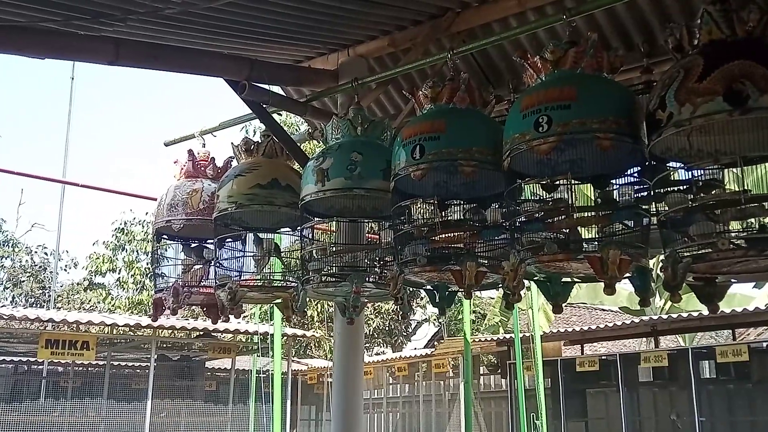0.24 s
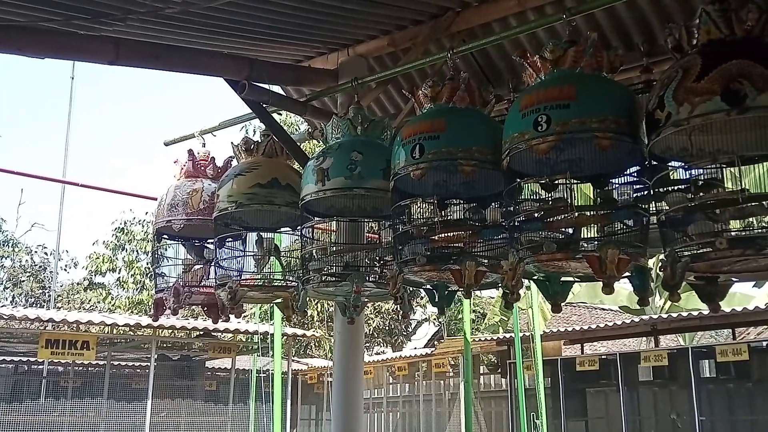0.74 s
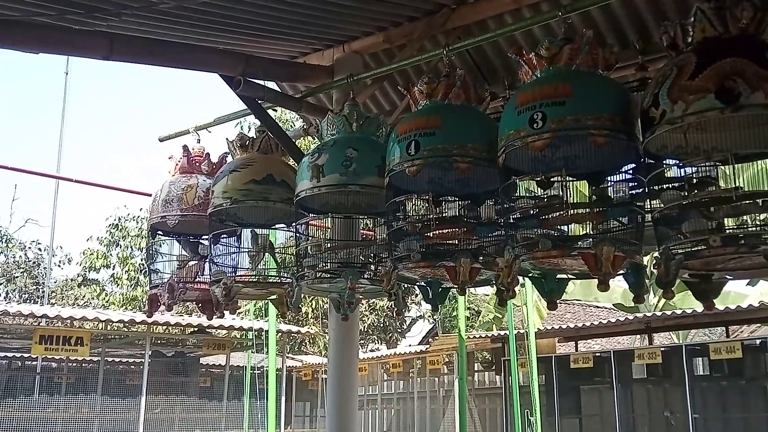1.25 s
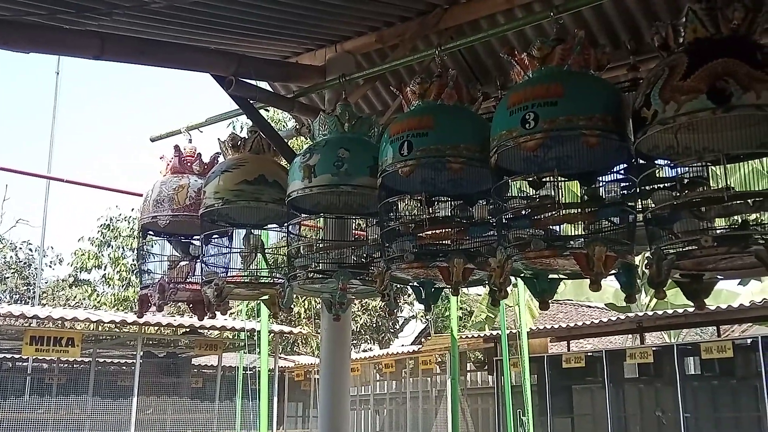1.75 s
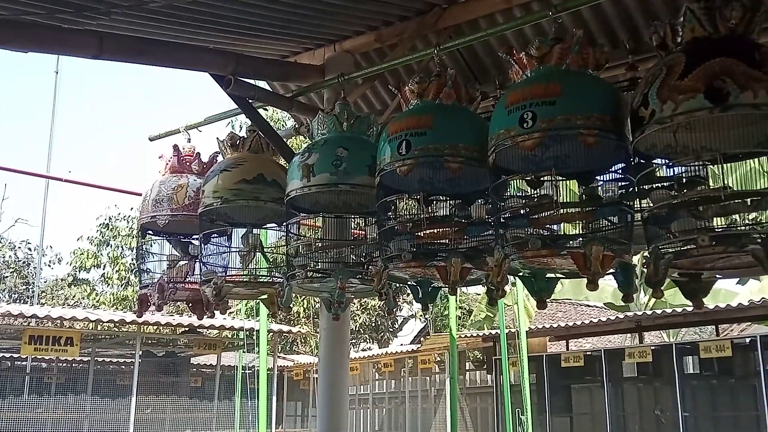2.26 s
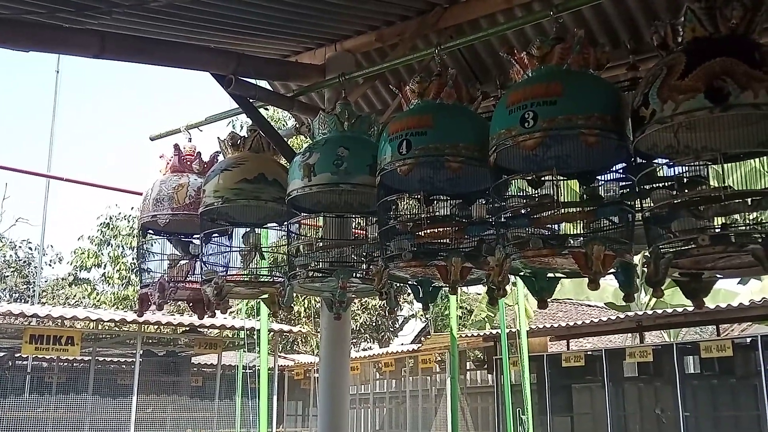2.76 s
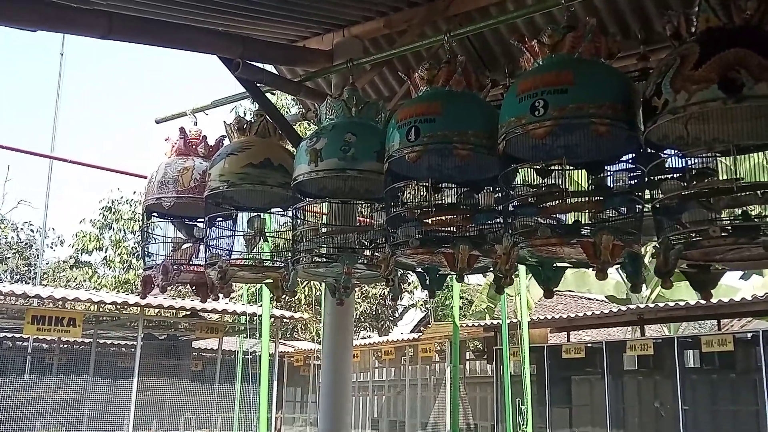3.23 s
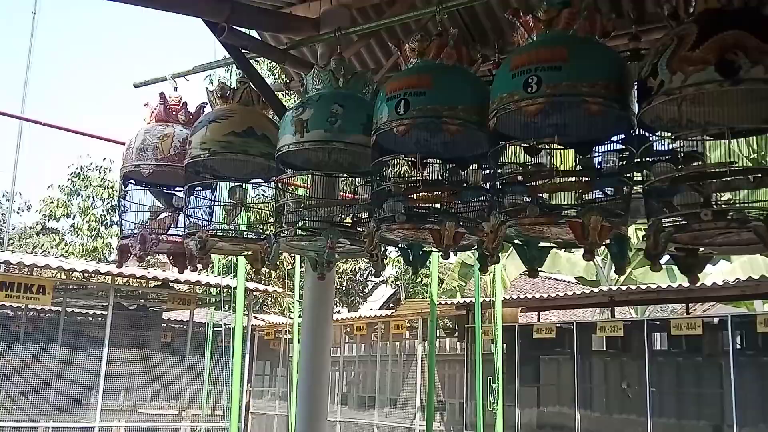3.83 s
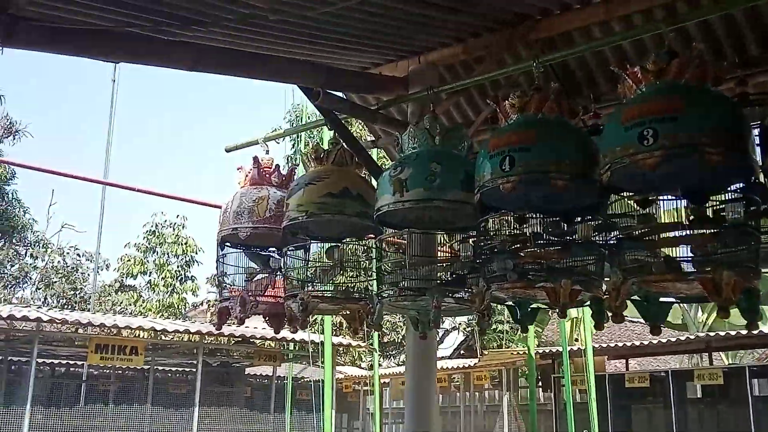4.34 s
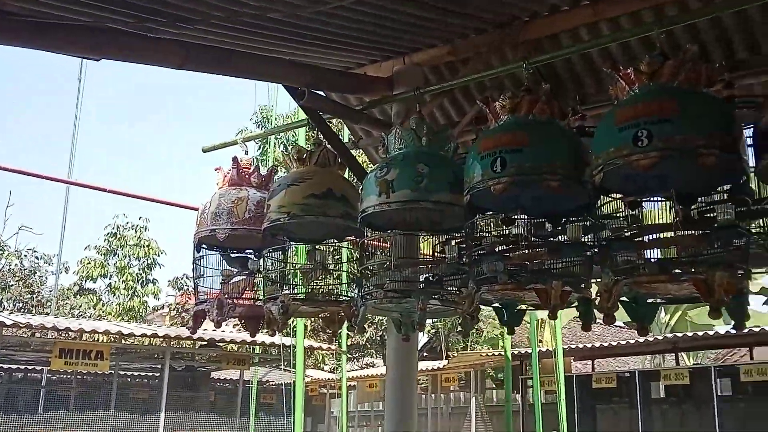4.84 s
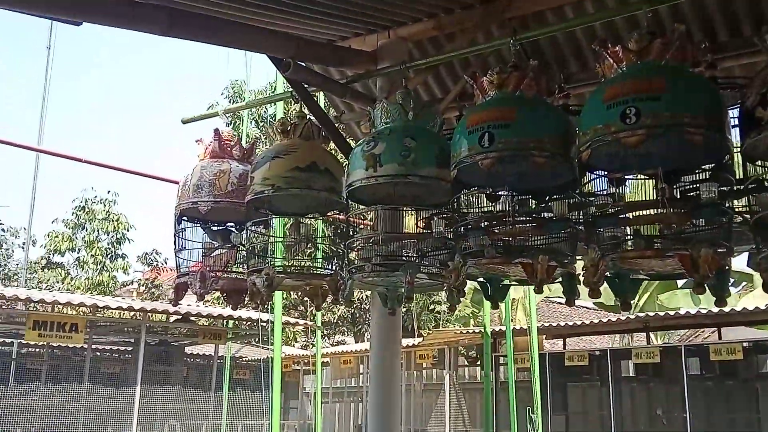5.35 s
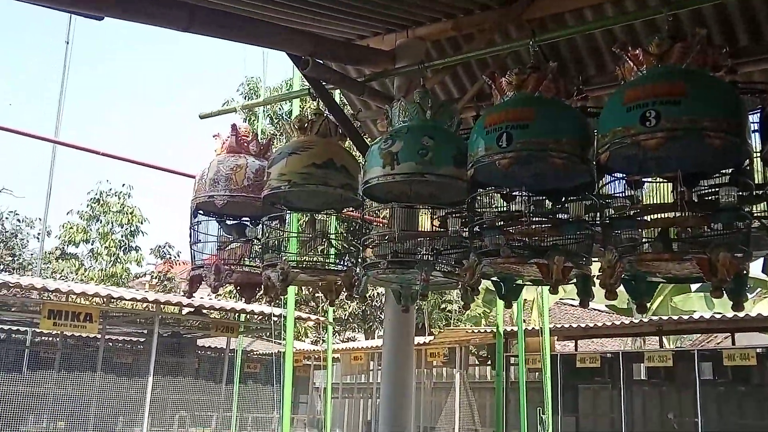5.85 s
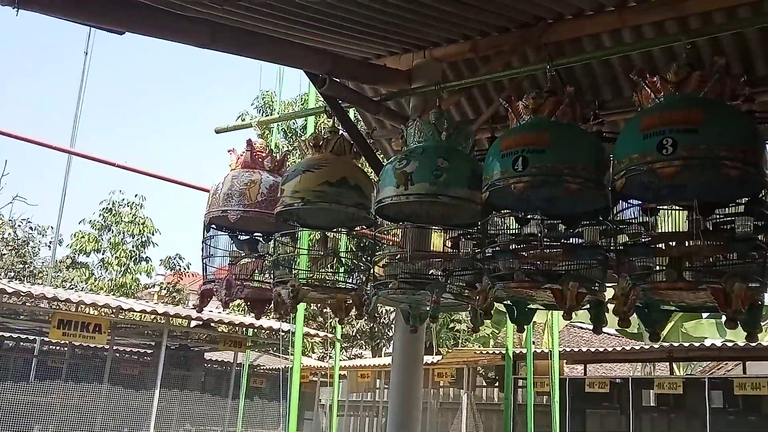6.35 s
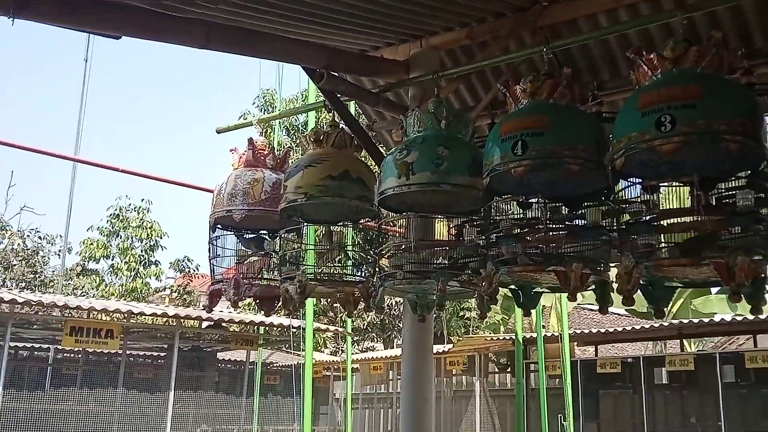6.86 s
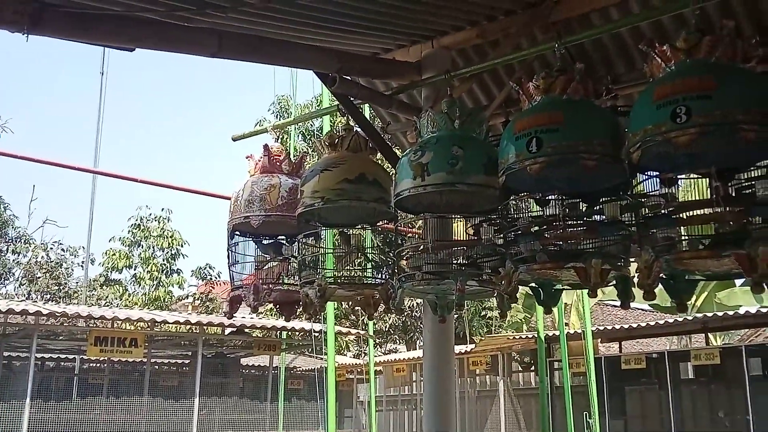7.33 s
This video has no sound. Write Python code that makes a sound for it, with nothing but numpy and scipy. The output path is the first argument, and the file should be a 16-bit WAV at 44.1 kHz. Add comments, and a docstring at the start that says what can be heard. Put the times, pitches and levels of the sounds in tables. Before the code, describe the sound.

Caged doves coo under a sheet roof with a short, diffuse echo. From 0 to 2.5 seconds the calls are soft and deep: round falling coos, purring rolls and faint held notes further away. Small birds give sparse, raspy falling chirps throughout, and light bright ticks come from the cages, clustered around 1.3 to 1.8 and again near 4.4. Around 3 seconds a clearer, higher coo dips and swells, trailing into a trill. From 4.7 the doves grow much louder and busier; the strongest, highest coo sinks in pitch near 4.8 to 5.05. Short coos and rolling trills overlap, with prominent arched calls at 5.7 and 6.7, then softer cooing to 7.6. Dry scuffs and grainy hiss flicker behind, strongest near 4.9. Small clicks come near 6 and 6.2, a dull bump at 6.6. A distant engine rumbles unevenly, swelling at the very end.

```python
"""Doves under a sheet roof

Caged doves coo in overlapping runs: gliding near-pure tones that break into trills made of short tone puffs.
Small birds chirp further off as falling raspy whistles; the cages tick, and bumps and knocks are noise bursts.
A distant engine is two wavering low tones in uneven low noise, under a faint, grainy, flickering rustle.
Faint wavering tones come from far outside. Decaying noise gives calls and ticks the echo of the roof."""
import sys
import numpy as np
from scipy import signal
from scipy.fft import rfft, irfft, next_fast_len
from scipy.io import wavfile
from scipy.ndimage import uniform_filter1d, map_coordinates

SR = 44100
rng = np.random.default_rng(int(sys.argv[2]) if len(sys.argv) > 2 else 0)


def waveform_to_disk(signal):
    """Save audio, clipped to [-1, 1], as 16-bit WAV at the path in sys.argv[1]."""
    frames = np.transpose(np.atleast_2d(signal))
    scaled = np.clip(frames, -1, 1) * 32767
    samples = np.round(scaled).astype(np.int16)
    wavfile.write(sys.argv[1], SR, samples)


N = 334719  # samples

# In all tables of notes the pitches are those of the glide, before the scoop and droop at its ends.


def doves():
    """Low-pass radiation: the throat holds back all higher overtones of deep, high and far voices."""
    voices = deep_doves() + high_doves() + far_doves()
    return filtered(voices, lambda hz: 1 / (1 + (hz / 1620) ** 20))


# long falling coos, levels before the standing waves: start_s, length_s, first_pitch_hz, last_pitch_hz, level_db
FALLING_COOS = [(0.2, 0.71, 636, 564.6, -53), (2.58, 0.63, 645.5, 578.2, -52),
                (4.89, .63, 656.7, 569, -54.5)]
# short coos, and at 1.01 s a faint held note from further down the row; levels before the standing waves:
# start_s, length_s, first_pitch_hz, last_pitch_hz, level_db
DEEP_COOS = [(0, 0.23, 465, 420.8, -48.5), (1.01, 0.47, 557, 568, -84), (1.63, 0.24, 645, 611.3, -50),
             (2.1, 0.23, 477.3, 456, -49.5), (3.14, 0.559, 479.6, 453, -50.5),
             (4.02, 0.19, 642.5, 618.7, -50)]
# rolled parts of the deep calls: start_s, rise_s, fall_s, centre_hz, peak_db
DEEP_TRILLS = [(-.1, 0.092, 0.24, 552, -50), (1.59, 0.026, 0.16, 588, -55.5), (2.07, 0.32, 0.3, 564, -52.5),
               (2.72, 0.31, 0.12, 463, -52.5), (3.98, 0.024, 0.065, 590, -52), (4.48, 0.19, 0.31, 548, -56),
               (7.2, 0.12, 0.14, 573, -55)]
# one standing wave that hums on after the deep coos: centre_hz, width_hz, level_db
SHED_MODE = [(624, 5.3, -1.5)]


def deep_doves():
    """Room resonance: standing waves colour the deep coos, and one mode rings on after them."""
    calls = notes(FALLING_COOS, attack_s=0.0577, release_s=0.17, scoop=0.0069, droop=0.2187,
                  onset_db=-3.5, end_db=-2)
    calls += notes(DEEP_COOS, attack_s=0.041, release_s=0.077, scoop=0.02, droop=0.07,
                   onset_db=0.5, end_db=-13)
    clear = coos(through_standing_waves(calls), octave_db=-56, jitter=0.0088, flutter_db=1.9, wet_db=-4.5)
    rolls = swells(DEEP_TRILLS, onset_db=-13.5, end_db=-5.5, climb_per_s=0)
    rolled = trills(rolls, rate=42, uneven=0.13, puff_s=0.0158, scatter=0.033, wet_db=-1)
    return ringing(clear, SHED_MODE) + rolled


# response of the shed to a gliding deep coo: pitch_hz, gain_db
STANDING_WAVES = [(400, 4), (435, -14.5), (455, 6), (468, -6.5), (482, 9.5), (520, 1.5), (566, 14),
                  (592, -11.5), (603, 7), (612, -9), (624, 5), (641, -2), (655, 7.5)]


def through_standing_waves(calls):
    """Modal response: the level of each note follows the shed's gain at its momentary pitch."""
    return [np.column_stack([s, hz, db + along(STANDING_WAVES, hz)]) for s, hz, db in map(np.transpose, calls)]


# arched coos that open rolls: start_s, length_s, first_pitch_hz, last_pitch_hz, level_db
ARCHED_COOS = [(5.69, 0.23, 764.5, 772, -34), (6.69, 0.267, 745.6, 748, -36)]
# a softer coo rises, sags in the middle and swells again: time_s, pitch_hz, level_db
RISING_COO = [(2.925, 674, -56), (3.0, 761, -41), (3.085, 772, -54), (3.15, 756, -40.5), (3.21, 740, -53)]
# plain short coos: start_s, length_s, first_pitch_hz, last_pitch_hz, level_db
HIGH_COOS = [(4.71, 0.085, 715, 730, -39), (4.745, 0.074, 770, 782, -36.5), (5.04, 0.073, 814, 777, -33),
             (5.08, 0.085, 710, 695, -43.5), (5.375, 0.11, 713, 715, -38), (5.55, 0.11, 692, 686, -43.5),
             (5.93, 0.083, 747, 729, -35.5), (6.01, 0.15, 690.4, 681, -39.5), (6.6, 0.14, 675, 697, -48.5),
             (6.77, 0.18, 692, 683, -41), (6.91, 0.19, 734, 721, -43), (7.18, .14, 760, 630, -47),
             (7.32, 0.17, 690, 693, -48), (7.45, 0.2, 712, 698, -48.5)]
# the loudest coo lies in a higher register and swells as it sinks: time_s, pitch_hz, level_db
LEAPING_COO = [(4.779, 879, -35.5), (4.831, 882, -33), (4.897, 872, -34), (4.985, 850, -28),
               (5.046, 824, -31)]
# rolled parts of the high calls: start_s, rise_s, fall_s, centre_hz, peak_db
HIGH_TRILLS = [(2.88, 0.34, 0.64, 748, -49.5), (4.65, 0.13, 0.084, 750, -46), (5.02, 0.067, 0.22, 760, -60),
               (5.32, 0.02, 0.17, 782, -51.5), (5.66, 0.3, 0.52, 781, -44.5), (6.6, 0.4, 0.65, 773, -44.5)]


def high_doves():
    """Frequency glides: high voices sound arched, short and leaping coos, and rolls that creep upward."""
    arched = notes(ARCHED_COOS, attack_s=0.0727, release_s=0.029, scoop=0.1184, droop=0.059,
                   onset_db=-27.5, end_db=-9.5)
    short = notes(HIGH_COOS, attack_s=0.028, release_s=0.0425, scoop=0.03, droop=0.022,
                  onset_db=-4.5, end_db=-13.5)
    rolls = swells(HIGH_TRILLS, onset_db=-12, end_db=-29, climb_per_s=0.2)
    out = coos(arched + [RISING_COO], octave_db=-32, jitter=0.0038, flutter_db=2.3, wet_db=-13)
    out += coos(short, octave_db=-38.5, jitter=0.0044, flutter_db=2, wet_db=-4.5)
    out += coos([LEAPING_COO], octave_db=-35, jitter=0.003, flutter_db=1, wet_db=-18)
    return out + trills(rolls, rate=57.5, uneven=0.08, puff_s=0.009, scatter=0.035, wet_db=2)


# faint held notes from further down the row: start_s, length_s, first_pitch_hz, last_pitch_hz, level_db
FAR_COOS = [(0.2, 0.48, 673, 679, -66.5), (.9, 0.385, 653, 667, -64.5), (1.2, 0.42, 669.4, 669, -61),
            (6.48, 0.1394, 600, 622, -62)]


def far_doves():
    """Held tones with a stronger second harmonic, from further down the row."""
    calls = notes(FAR_COOS, attack_s=0.11, release_s=0.08, scoop=0.016, droop=-0.0078, onset_db=-9, end_db=-8)
    return coos(calls, octave_db=-10, jitter=0.005, flutter_db=2.2, wet_db=-8)


def coos(calls, octave_db, jitter, flutter_db, wet_db):
    """Acoustic filtering: with the beak shut, the swollen throat passes an almost pure tone."""
    out = np.zeros(N)
    for call in calls:
        hz, gain = contour(call)
        n = len(hz)
        phase = phase_of(hz * (1 + jitter * wobble(70.8, n)))
        tone = np.sqrt(2) * (np.sin(phase) + amp(octave_db) * np.sin(2 * phase))
        flutter = amp(flutter_db * wobble(60.4, n))
        add(out, call[0][0], under_roof(tone * gain * flutter, wet_db))
    return out


def trills(calls, rate, uneven, puff_s, scatter, wet_db):
    """Pulsed excitation: the syrinx opens rate times a second, each time letting out one puff of tone."""
    out = np.zeros(N)
    t = np.arange(0, puff_s, 1 / SR)
    window = np.sin(np.pi * t / puff_s) ** 2
    for call in calls:
        hz, gain = contour(call)
        n = len(hz)
        roll = np.zeros(n)
        turns = np.cumsum(rate * (1 + uneven * wobble(rate / 2, n))) / SR
        for i in np.flatnonzero(np.diff(np.floor(turns))):
            size, detune = rng.standard_normal(2)
            puff_hz = hz[i] * (1 + scatter * detune)
            puff = window * np.cos(2 * np.pi * puff_hz * (t - puff_s / 2))
            add(roll, i / SR, amp(2 * size) * puff)
        add(out, call[0][0], under_roof(unit(roll) * gain, wet_db))
    return out


def notes(rows, attack_s, release_s, scoop, droop, onset_db, end_db):
    """Pitch glide: a note bends into its glide and out of it as the level changes. Gives (s, Hz, dB) tracks."""
    calls = []
    for s, length, first_hz, last_hz, db in rows:
        t = np.arange(0, length, 1 / 1000)
        rise = np.clip(1 - t / attack_s, 0, 1)
        fall = np.clip(1 - (length - t) / release_s, 0, 1)
        glide = np.interp(t, [attack_s, max(attack_s, length - release_s)], [first_hz, last_hz])
        hz = glide * (1 - scoop * rise) * (1 - droop * fall)
        calls.append(np.column_stack([s + t, hz, db + onset_db * rise + end_db * fall]))
    return calls


def swells(rows, onset_db, end_db, climb_per_s):
    """Amplitude envelope: a roll swells to a rounded peak and dies away. Gives (s, Hz, dB) tracks."""
    calls = []
    for s, rise, fall, hz, db in rows:
        t = np.linspace(max(s, 0), s + rise + fall, 20)
        past_peak = t - s - rise
        before_db = onset_db * (past_peak / rise) ** 2
        after_db = end_db * (past_peak / fall) ** 2
        sink_db = np.where(past_peak < 0, before_db, after_db)
        climb = 1 + climb_per_s * np.maximum(past_peak, 0)
        calls.append(np.column_stack([t, hz * climb, db + sink_db]))
    return calls


def contour(call, fade=0.012):
    """Interpolated modulation: pitch and gain of one call per sample, with smooth edges of fade seconds."""
    s, hz, db = np.transpose(call)
    t = np.arange(s[0], s[-1], 1 / SR)
    edges = np.clip(np.minimum(t - s[0], s[-1] - t) / fade, 0, 1)
    return np.interp(t, s, hz), amp(np.interp(t, s, db)) * np.sin(edges * np.pi / 2) ** 2


# steep chirps: start_s, level_db
CHIPS = [(.24, -60.5), (.85, -72.5), (.97, -58.5), (2.09, -60), (3.01, -59), (3.99, -57), (4.75, -54),
         (5.55, -54.5), (5.98, -55.5), (6.95, -58)]
# lower, flatter chirps: start_s, level_db
CHEEPS = [(1.10, -62.5), (2.38, -60), (3.15, -57.5), (4.18, -57.5), (5.07, -61.5), (5.23, -64), (6.15, -59)]


def small_birds():
    """Downward frequency sweeps: steep chips and lower, flatter cheeps."""
    chips = chirps(CHIPS, start_hz=4217, end_hz=2910, length=0.065, rasp=0.1233, upper_db=-9.5, wet_db=3)
    cheeps = chirps(CHEEPS, start_hz=3726, end_hz=2840, length=0.095, rasp=0.085, upper_db=-13, wet_db=1)
    return chips + cheeps


def chirps(rows, start_hz, end_hz, length, rasp, upper_db, wet_db):
    """Frequency modulation: raspy falling whistles with a weaker upper voice, heard mostly by their echoes."""
    out = np.zeros(N)
    u = np.linspace(0, 1, int(length * SR))
    envelope = np.sqrt(np.abs(np.sin(np.pi * u)))
    for s, db in rows:
        sweep = start_hz + (end_hz - start_hz) * u ** 1.5
        phase = phase_of(sweep * (1 + rasp * wobble(696.5, len(u))))
        whistle = np.sin(phase) + amp(upper_db) * np.sin(1.5 * phase)
        add(out, s, under_roof(amp(db) * unit(whistle * envelope), wet_db))
    return out


# ticks on the cages, level before the common lift: start_s, level_db, low_ring_share_db
TICKS = [(0.421, -55, -5.5), (1.295, -50.5, -9), (1.334, -54, 3.5), (1.6066, -49.5, -14), (1.708, -50, -21),
         (1.7568, -55.5, -12), (1.806, -46.5, -11), (2.226, -51.5, -10), (2.399, -52.5, 2.5),
         (4.368, -53.5, -30), (4.4187, -51, -11), (4.462, -52.5, -22), (4.757, -54.5, -20),
         (6.688, -52.5, -7), (7.5084, -50.5, -7.5)]
# spectrum of the bright snap: frequency_hz, relative_level_db
TICK_TOP = [(4500, -29), (6800, 0.5), (9500, -7), (15500, -13)]


def ticks(lift_db, rise_s, t60, wet_db):
    """Impact excitation: beaks and claws strike the thin bars, a bright snap over a lower ring."""
    out = np.zeros(N)
    t = np.arange(SR // 8) / SR
    for s, db, low_db in TICKS:
        snap = noise(TICK_TOP, len(t)) + amp(low_db) * band(4100, 0.69, len(t))
        envelope = amp(db + lift_db - 60 * t / t60) * (1 - np.exp(-t / rise_s))
        add(out, s, under_roof(envelope * snap, wet_db))
    return out


# dry clicks close by: start_s, starting_level_db
CLICKS = [(5.958, -49), (6.1732, -40)]


def clicks(t60):
    """Near-field impulses: quickly decaying noise with the scuffs' spectrum and no echo."""
    out = np.zeros(N)
    t = np.arange(SR // 8) / SR
    for s, db in CLICKS:
        add(out, s, amp(db - 60 * t / t60) * noise(SCUFF, len(t)))
    return out


# soft bumps and hollow knocks: start_s, centre_hz, width_octaves, level_db
BUMPS = [(1.459, 340, 0.94, -56), (2.392, 1640, 0.51, -61.5), (5.263, 1750, 0.52, -60),
         (6.119, 232, 0.16, -55), (6.335, 1324, 0.41, -62.5), (6.64, 236.3, 0.12, -44.5)]


def bumps(rise_s):
    """Damped broad resonance: dull bumps and knocks from around the yard."""
    out = np.zeros(N)
    u = np.arange(SR // 3) / SR / rise_s
    for s, hz, octaves, db in BUMPS:
        add(out, s, amp(db) * u * np.exp(1 - u) * band(hz, octaves, len(u)))
    return out


# level of the airy hiss before the common lift: time_s, level_db
HISS = [(0, -72), (1.6, -77.5), (1.95, -68.5), (2.35, -69), (2.8, -69), (3.25, -66), (3.55, -78.5),
        (4.05, -66), (4.33, -76), (4.5, -65.5), (4.59, -80), (4.63, -68), (4.93, -58), (5.25, -68),
        (5.76, -61.5), (5.85, -79), (5.93, -64), (6.25, -62.5), (6.47, -72.5), (6.55, -65.5), (7.59, -65.5)]
# spectrum of the hiss: frequency_hz, relative_level_db
RUSTLE = [(800, -10.5), (1300, -1.5), (2300, -7.5), (4200, -7.5), (6300, 3), (8000, -4.5), (10000, 2.5),
          (15500, -17.5)]


def rustle(lift_db, fizz_db, patchy_db):
    """Amplitude modulation: an airy hiss with a random grainy flicker, brightest at its peaks."""
    flicker = grainy_flicker(rate=160, spread_db=12.5, t60=0.22)
    fizz = amp(fizz_db) * unit(flicker ** 2) * band(13500, 0.7, N)
    hiss = flicker * patchy(noise(RUSTLE, N), patchy_db)
    return amp(level_curve(HISS) + lift_db) * (hiss + fizz)


def grainy_flicker(rate, spread_db, t60):
    """Shot noise: gain of rms 1 from random grains, each with a sudden start and a quick decay."""
    grains = (rng.random(N) < rate / SR) * amp(spread_db * rng.uniform(-1, 1, N))
    decay = amp(-60 * np.arange(SR // 4) / SR / t60)
    power = signal.fftconvolve(grains ** 2, decay ** 2)[:N]
    return unit(np.sqrt(np.abs(power)))


# dry scuffs and rustles: start_s, length_s, level_db
SCUFFS = [(0.131, 0.42, -72.5), (2.32, 0.32, -68), (2.915, 0.58, -65), (4.794, 0.47, -63),
          (5.942, 0.54, -67), (6.599, 0.13, -60.5), (7.044, 0.31, -64)]
# spectrum of scuffs and clicks: frequency_hz, relative_level_db
SCUFF = [(800, -4.5), (1300, 6.5), (3500, -1), (6500, -0.5), (15000, -31)]


def scuffs(grain_db, patchy_db):
    """Friction noise: dry scuffs swell and fade in clumps of fine grains."""
    out = np.zeros(N)
    for s, length, db in SCUFFS:
        n = int(length * SR)
        clumps = amp(grain_db * (wobble(30.2, n) + wobble(250, n)))
        grains = clumps * patchy(noise(SCUFF, n), patchy_db)
        add(out, s, amp(db) * signal.windows.tukey(n, 0.5) * unit(grains))
    return out


# fixed resonances that colour the rustle and scuffs: centre_hz, width_hz, level_over_plain_sound_db
COLOUR_RINGS = [(3000, 110, -3), (3620, 130, 4), (4290, 250, 0.5)]


def coloured_rustle():
    """Resonant colouration: fixed narrow resonances colour the rustle and scuffs."""
    source = rustle(lift_db=1.5, fizz_db=-14.5, patchy_db=3.8) + scuffs(grain_db=2, patchy_db=3.8)
    return ringing(source, COLOUR_RINGS)


# level of the low rumble, before a random wobble: time_s, level_db
RUMBLE_LEVEL = [(0, -59.5), (0.45, -75), (0.72, -66.5), (1.5, -71.5), (1.75, -69), (1.99, -74),
                (2.13, -64.5), (2.85, -67), (3.04, -74), (3.23, -61.5), (4.2, -64.5), (4.6, -59),
                (5.8, -61), (7.3, -59), (7.59, -48.5)]
# spectrum of the low noise: frequency_hz, relative_level_db
RUMBLE = [(25, -25), (48, -16.5), (75, -2.5), (150, -10.5), (600, -36), (2500, -69.5)]


def engine(hum_hz, hum_db, second_db, noise_db, wobble_db):
    """Harmonic tones in noise: a far engine as two wavering low tones in an uneven low rumble."""
    phase = phase_of(hum_hz * (1 + 0.0207 * wobble(12, N)))
    hum = amp(hum_db + 4.7 * wobble(42, N)) * np.sin(phase)
    hum += amp(second_db + 6.1 * wobble(24, N)) * np.sin(2 * phase)
    level = amp(level_curve(RUMBLE_LEVEL) + wobble_db * wobble(12, N))
    return level * (hum + amp(noise_db) * noise(RUMBLE, N))


# wavering tones from far outside the shed: start_s, length_s, first_pitch_hz, last_pitch_hz, level_db
FAR_TONES = [(0, 0.3, 130, 135, -60.5), (0.48, 0.26, 181.4, 119, -65), (4.57, 0.113, 1126, 1202, -63.5),
             (6.47, 0.3, 1285, 1110, -63.5)]
# a low tone that wanders up and down: time_s, pitch_hz, level_db
WANDERING_TONE = [(3.12, 153.7, -59), (3.27, 183.8, -58.5), (3.42, 149.2, -62), (3.64, 172, -59),
                  (3.84, 197.6, -60.5), (4.05, 127, -66)]


def far_tones():
    """Random frequency modulation: wavering tones from far outside the shed."""
    distant = notes(FAR_TONES, attack_s=0.03, release_s=0.063, scoop=0, droop=0, onset_db=2, end_db=-6)
    out = coos(distant, octave_db=-31, jitter=0.03, flutter_db=4, wet_db=5)
    return out + coos([WANDERING_TONE], octave_db=-19, jitter=0.025, flutter_db=3, wet_db=-3)


def under_roof(x, wet_db, t60=0.38):
    """Diffuse reverberation: direct sound plus the answer of roof and walls, at equal total power."""
    t = np.arange(SR // 2) / SR
    wet = signal.fftconvolve(x, rng.standard_normal(len(t)) * amp(-60 * t / t60))
    wet *= amp(wet_db) * np.linalg.norm(x) / np.linalg.norm(wet)
    return (np.pad(x, (0, len(t) - 1)) + wet) / np.hypot(1, amp(wet_db))


def ringing(x, rings):
    """Modal resonance: add narrow modes, given as (Hz, width Hz, dB), that ring on after the sound."""
    def response(hz):
        modes = (amp(db) * 1j * hz * w / (c * c - hz * hz + 1j * hz * w) for c, w, db in rings)
        return 1 + sum(modes)
    return filtered(x, response)


def patchy(x, depth_db):
    """Time-frequency modulation: patches of the spectrum swell and fade on their own."""
    z = signal.stft(x, nperseg=512)[2]
    field = uniform_filter1d(rng.standard_normal(z.shape), size=7, axis=0)
    field = uniform_filter1d(field, size=12, axis=1)
    return unit(signal.istft(z * amp(depth_db * unit(field)), nperseg=512)[1][:len(x)])


def noise(spectrum, n):
    """Spectral shaping: coloured noise of rms 1."""
    return unit(filtered(rng.standard_normal(n), lambda hz: amp(along(spectrum, hz))))


def band(centre_hz, octaves, n):
    """Broad resonance: noise of rms 1 under a bell curve on a log frequency axis."""
    def bell(hz):
        return np.exp(-(np.log2((hz + 1) / centre_hz) / octaves) ** 2)
    return unit(filtered(rng.standard_normal(n), bell))


def filtered(x, response):
    """Linear filtering: the spectrum of x times a response of frequency."""
    m = next_fast_len(len(x) + SR // 4)
    return irfft(rfft(x, m) * response(np.fft.rfftfreq(m, 1 / SR)), m)[:len(x)]


def wobble(rate, n):
    """Band-limited fluctuation: a smooth random curve with rate knots a second."""
    return map_coordinates(rng.standard_normal(int(n * rate / SR) + 4), [np.arange(n) * rate / SR])


def phase_of(hz):
    """Phase is the running integral of frequency."""
    return 2 * np.pi * np.cumsum(hz) / SR


def amp(db):
    """Logarithmic level: decibels to gain."""
    return 10 ** (np.asarray(db) / 20)


def unit(x):
    """Power normalisation: scale to rms 1."""
    return x / np.sqrt(np.mean(x ** 2) + 1e-20)


def along(points, hz):
    """Log-frequency interpolation of (Hz, value) points."""
    f, v = np.transpose(points)
    return np.interp(np.log(hz + 1), np.log(f), v)


def level_curve(rows):
    """Linear interpolation of (s, dB) rows to one level per sample."""
    s, db = np.transpose(rows)
    return np.interp(np.arange(N) / SR, s, db)


def add(track, s, sound):
    """Superposition: mix a sound in at time s."""
    part = track[max(0, round(s * SR)):][:len(sound)]
    part += sound[:len(part)]


def scene():
    """Superposition of the doves close by with small birds, cages and the yard behind them."""
    cages = ticks(lift_db=5, rise_s=0.0041, t60=0.082, wet_db=-3.5) + clicks(t60=0.005)
    yard = bumps(rise_s=0.025) + coloured_rustle() + far_tones()
    yard += engine(hum_hz=72, hum_db=0.5, second_db=-7, noise_db=-1, wobble_db=3)
    return (doves() + small_birds() + cages + yard)[None]


def record(dry):
    """Band limiting: nothing from 15750 Hz upward remains."""
    return np.array([filtered(x, lambda hz: hz < 15750) for x in dry])


dry = scene()
out = record(dry)
waveform_to_disk(out)
```